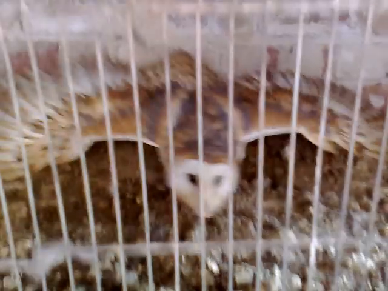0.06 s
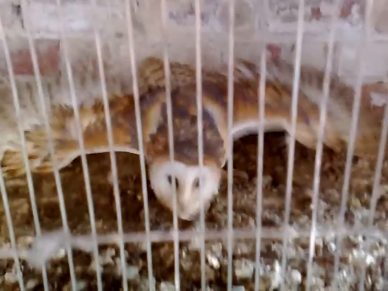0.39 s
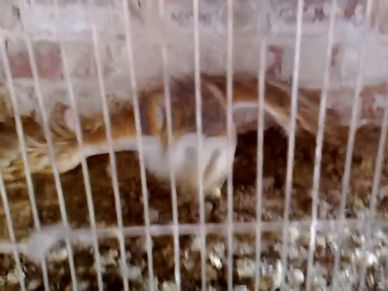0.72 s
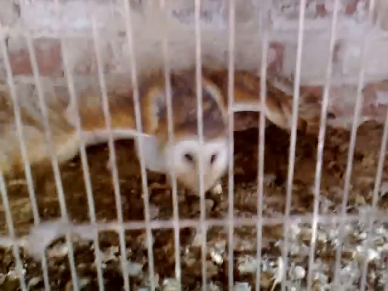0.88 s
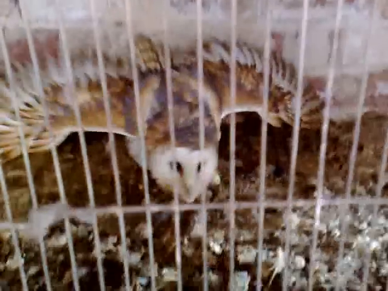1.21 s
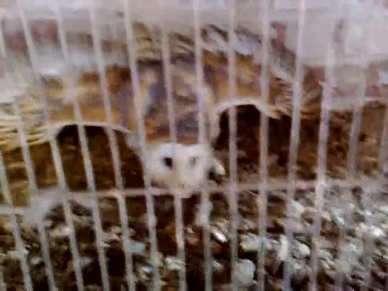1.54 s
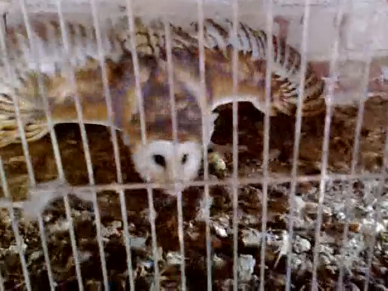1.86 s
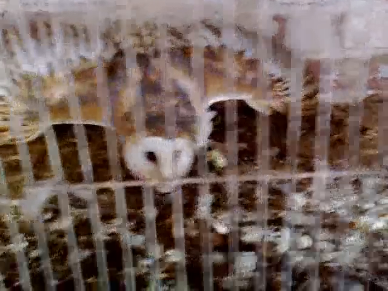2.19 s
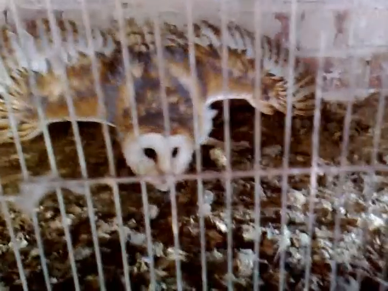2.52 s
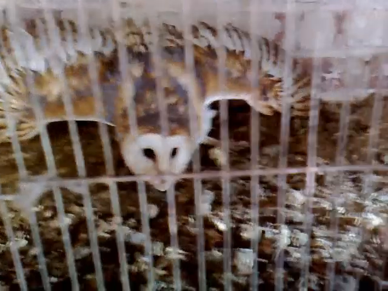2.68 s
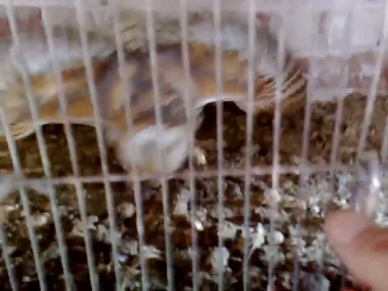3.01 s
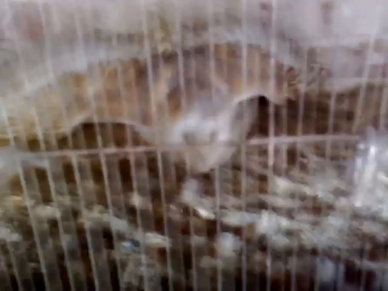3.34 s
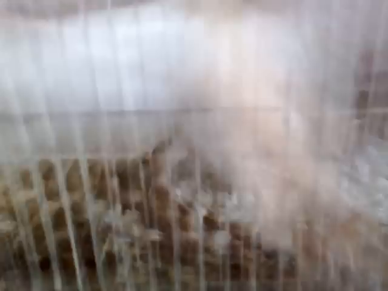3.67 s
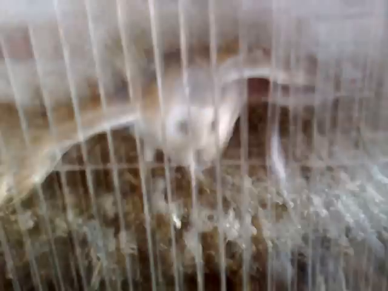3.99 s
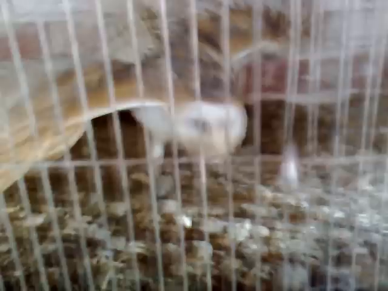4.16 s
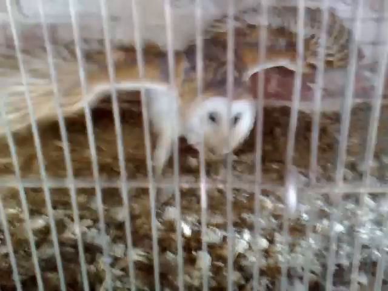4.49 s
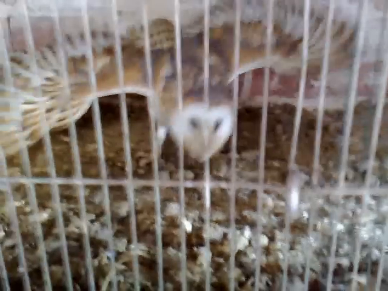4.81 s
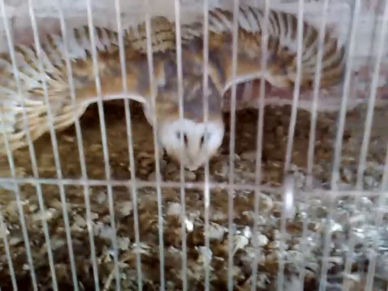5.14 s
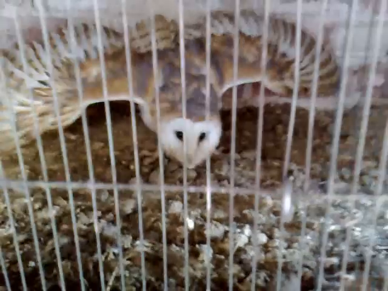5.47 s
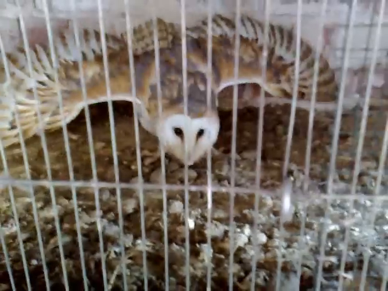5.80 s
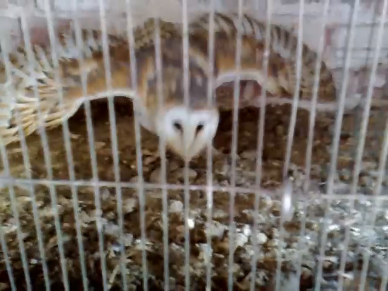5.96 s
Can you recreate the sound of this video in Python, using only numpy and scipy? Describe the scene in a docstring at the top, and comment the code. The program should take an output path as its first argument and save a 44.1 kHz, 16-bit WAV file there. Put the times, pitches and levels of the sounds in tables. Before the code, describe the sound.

Sharp bill clicks and breathy owl hisses, broken by a short, loud burst of knocking and rustling against cage bars.

```python
"""A barn owl hisses from a wire cage in a brick corner: air rushing through throat, mouth and bill.
Its bill snaps and clucks, its throat squeaks once, and faint puffs of breath fall between the snaps.
A hand sweeps at the bars close to the microphone and the owl lunges: a scuffle, with blows that
rattle the bars and make the cage floor boom. A second, longer and sharper hiss follows,
with thin whistles in it."""
import sys
import numpy as np
from scipy import signal
from scipy.fft import irfft, next_fast_len
from scipy.io import wavfile
from scipy.ndimage import uniform_filter1d

SR = 44100
rng = np.random.default_rng(int(sys.argv[2]) if len(sys.argv) > 2 else 0)


def generate_wav(sig):
    """Save sig (samples, or channels by samples) to the path in sys.argv[1] as 16-bit PCM at SR."""
    pcm = np.round(np.clip(np.atleast_2d(sig).T, -1, 1) * 32767).astype(np.int16)
    wavfile.write(sys.argv[1], SR, pcm)


N = 272538
TIME_S = np.arange(N) / SR


def gain_of(db):
    """Decibels to amplitude."""
    return 10 ** (np.asarray(db) / 20)


def unit_rms(x):
    """Scales to rms 1."""
    return x / np.sqrt(np.mean(x ** 2) + 1e-20)


def curve_at(points, hz):
    """Interpolates on a log-frequency axis."""
    knots_hz, values = np.transpose(points)
    return np.interp(np.log(hz + 1), np.log(knots_hz + 1), values)


def gate(start_s, end_s, rise_s, fall_s):
    """One from start to end, linear ramps outside."""
    return np.clip((TIME_S - start_s) / rise_s + 1, 0, 1) * np.clip((end_s - TIME_S) / fall_s + 1, 0, 1)


def add(mix, at_s, sound):
    """Mixes a sound in place."""
    part = mix[max(round(at_s * SR), 0):][:len(sound)]
    part += sound[:len(part)]


def noise(spectrum, size=N, top_hz=SR):
    """Coloured noise, rms 1, dulled above top_hz."""
    n = next_fast_len(size, True)
    hz = np.fft.rfftfreq(n, 1 / SR)
    colour = gain_of(curve_at(spectrum, hz)) / np.hypot(1, (hz / top_hz) ** 2)
    return unit_rms(irfft(colour * np.exp(2j * np.pi * rng.random(len(hz))), n)[:size])


def wander(knots_per_s):
    """Piecewise-linear random drift, rms 1."""
    knots = rng.standard_normal(4096)
    return unit_rms(np.interp(TIME_S * knots_per_s, np.arange(len(knots)), knots))


def resonance(hz, width_hz):
    """Turbulence in a steep resonance that follows hz, rms 1."""
    pole = np.exp(-np.pi * abs(width_hz) / SR)
    i, q = signal.lfilter([1], [1, -2 * pole, pole * pole], rng.standard_normal((2, N)))
    phase = 2 * np.pi * np.cumsum(hz * np.ones(N)) / SR
    return unit_rms(i * np.cos(phase) + q * np.sin(phase))


def bill_fizz(spectrum, flicker_db=2.5):
    """Air over the bill edges; its colour flickers in patches."""
    bins = signal.stft(noise(spectrum), SR, nperseg=512)[2]
    patches = uniform_filter1d(rng.standard_normal(bins.shape), size=7, axis=0)
    patches = unit_rms(uniform_filter1d(patches, size=9, axis=1))
    return unit_rms(signal.istft(bins * gain_of(flicker_db * patches), SR, nperseg=512)[1][:N])


# throat air (frequency [Hz], density [dB])
THROAT_SPECTRUM = [(200, -30), (400, -20.5), (780, -5), (980, -4.5), (1200, 1.5), (1620, -2), (1880, -5),
                   (2080, -8), (2450, -10), (3100, -19), (4500, -23.5), (16000, -56)]
# throat resonances (frequency [Hz], width [Hz], level [dB])
THROAT_FORMANTS = [(799, 105, -17.5), (1650, 130, -16.5), (1899, 95, -15.5), (2153, 160, -20.5),
                   (2484, 99, -19.5), (3137, 160, -27)]

def hiss(row, fizz_spectrum, throat_db, mouth_db, flutter_db, surge_db):
    """Air rushes through throat, mouth and bill; rising effort opens the mouth and lifts ring and fizz."""
    start_s, end_s, swell_s, effort_db, open_hz, width_hz, fizz_db = row
    slack_db = 5.5 * np.exp(-np.maximum(TIME_S - start_s, 0) / swell_s)  # below full effort
    mouth_hz = open_hz - 35 * slack_db + 28 * wander(25)
    mouth = gain_of(mouth_db - 0.7 * slack_db) * resonance(mouth_hz, width_hz)
    throat = gain_of(throat_db) * noise(THROAT_SPECTRUM)
    throat += sum(gain_of(db) * resonance(hz, band_hz) for hz, band_hz, db in THROAT_FORMANTS)
    air = (throat + mouth) * gain_of(flutter_db * wander(140))
    level = gain_of(effort_db - slack_db + surge_db * wander(15))
    fall_s, closing_s = 0.04, 0.18
    bill_open = np.clip((end_s + fall_s - TIME_S) / closing_s, 0, 1)
    fizz = bill_open * gain_of(fizz_db - slack_db) * bill_fizz(fizz_spectrum)
    return (air + fizz) * level * gate(start_s, end_s, 0.088, fall_s)


# hisses (start [s], end [s], swell [s], full effort [dB], mouth [Hz], width [Hz], relative fizz [dB])
HISSES = [(0.01, 0.593, 0.0199, -34, 1272, 65, -17.5), (4.28, 6.4, 0.55, -29.5, 1475, 179, -8.5)]
# air at the bill edges, per hiss (frequency [Hz], density [dB])
FIRST_FIZZ_SPECTRUM = [(3000, -29), (5000, -22), (6500, -4), (8700, 6), (11000, -7), (13300, 1.5),
                       (16000, -10)]
SECOND_FIZZ_SPECTRUM = [(3000, -18), (4500, -7), (5300, -9), (9400, -1.5), (10300, -3.5), (11300, -2),
                        (14200, 2.5), (15100, -11)]

def hisses():
    """Two threatening breaths, the second longer and sharper."""
    first = hiss(HISSES[0], FIRST_FIZZ_SPECTRUM, throat_db=-2.5, mouth_db=-4.5,
                 flutter_db=-1.0, surge_db=1.38)
    second = hiss(HISSES[1], SECOND_FIZZ_SPECTRUM, throat_db=-3.5, mouth_db=-2.3,
                  flutter_db=1.0, surge_db=0.4)
    return first + second


# whistles in the hisses (start [s], end [s], frequency [Hz], width [Hz], level [dB])
WHISTLES = [(0.0, 0.542, 2764, 130, -52.5), (4.53, 5.17, 6280, 243, -52.5), (4.5, 6.3, 9380, 463, -49.5),
            (4.62, 6.34, 11300, 278.6, -47), (4.98, 6.26, 7500, 240.7, -67), (5.5, 6.3, 4020, 110, -51.5)]

def whistles(flicker_db=2.0):
    """Thin, flickering air resonances: one in the first hiss, five in the second."""
    out = np.zeros(N)
    for start_s, end_s, hz, width_hz, db in WHISTLES:
        envelope = gate(start_s + 0.12, end_s - 0.1, 0.18, 0.11)
        out += gain_of(db + flicker_db * wander(18)) * resonance(hz, width_hz) * envelope
    return out


# ambient air, microphone hiss (frequency [Hz], density [dB])
AMBIENT_SPECTRUM = [(20, -2.5), (60, 0), (130, -9.5), (450, -10), (900, -14), (1250, -12.5), (1600, -20),
                    (2500, -19), (3200, -26.5), (16000, -60)]
MIC_SPECTRUM = [(1000, 2.5), (16000, -1)]
# ambient air trim (time [s], level [dB])
AMBIENT_TRIM = [(1.3, 3), (2.5, -2)]

def background(air_db=-59, mic_db=-69.5):
    """Quiet low air, a little louder at first, and steady microphone hiss."""
    trim_db = np.interp(TIME_S, *np.transpose(AMBIENT_TRIM))
    return gain_of(air_db + trim_db) * noise(AMBIENT_SPECTRUM) + gain_of(mic_db) * noise(MIC_SPECTRUM)


# bill impact (frequency [Hz], density [dB])
CRACK_SPECTRUM = [(150, -32.5), (450, -21.5), (900, -0.5), (1600, -0.5), (2400, -7), (2900, -9.5),
                  (3500, -12.5), (5300, -17), (7500, -24.5), (16000, -26.5)]

def snap(ring_db, mouth_hz, crack_db, crack_peak_s, ring_peak_s=0.0023, overtone_db=-22):
    """The bill cracks shut, brighter the harder; the closing mouth rings for a few falling cycles."""
    t = np.arange(2048) / SR
    ring_age, crack_age = t / ring_peak_s, t / crack_peak_s
    falling_hz = mouth_hz * (1 + 0.056 * np.tanh(1 - ring_age))
    phase = 2 * np.pi * np.cumsum(falling_hz) / SR
    mouth = np.sin(phase) + gain_of(overtone_db) * np.sin(2 * phase)
    mouth *= (ring_age * np.exp(1 - ring_age)) ** 2.45
    crack = noise(CRACK_SPECTRUM, size=len(t), top_hz=36000 * gain_of(crack_db / 2))
    crack *= (crack_age * np.exp(1 - crack_age)) ** 2
    return gain_of(ring_db) * mouth + gain_of(crack_db) * crack


# bill snaps (time [s], ring [dB], mouth [Hz], crack [dB])
SNAPS = [(0.0173, -20, 1390, -13), (0.7005, -17, 1190, -12.5), (0.92, -16, 773, -18),
         (1.5534, -9.5, 1334, -13.5), (2.4302, -9, 1367, -14), (3.3668, -15.5, 1301, -15),
         (5.447, -22, 1136, -15)]
# clucks leading up to snaps (time [s], ring [dB])
CLUCKS = [(0.6395, -19.5), (0.857, -30.5), (1.424, -44), (1.4885, -16.5), (2.286, -41.5), (2.37, -17.5),
          (3.227, -44), (3.3137, -26)]

def snaps_and_clucks():
    """Hard snaps, and clucks: the same motion made gently."""
    out = np.zeros(N)
    for at_s, ring_db, mouth_hz, crack_db in SNAPS:
        add(out, at_s, snap(ring_db, mouth_hz, crack_db, crack_peak_s=0.003))
    for at_s, ring_db in CLUCKS:
        add(out, at_s, snap(ring_db, mouth_hz=1323, crack_db=-25 + 0.57 * ring_db, crack_peak_s=0.0031))
    return out


# squeak partials (harmonic [number], level [dB])
SQUEAK_HARMONICS = [(1, -2), (2, 9.5), (3, -19), (4, -15), (6, -20)]

def squeak(start_s=0.605, end_s=0.638, level_db=-34, start_hz=825, sag_hz_per_s=1500, jitter=0.0074):
    """The narrowing throat ends the first hiss on a brief falling note."""
    hz = start_hz - sag_hz_per_s * (TIME_S - start_s)
    phase = 2 * np.pi * np.cumsum(hz * (1 + jitter * wander(300))) / SR
    tone = sum(gain_of(db) * np.cos(k * phase) for k, db in SQUEAK_HARMONICS)
    return gain_of(level_db) * unit_rms(tone) * gate(start_s, end_s, 0.007, 0.0064)


def ring(modes, t):
    """Struck modes decaying from random phases."""
    return sum(gain_of(db - 60 * t / t60_s) * np.sin(2 * np.pi * (hz * t + rng.random()))
               for hz, db, t60_s in modes)


# blows on the cage (time [s], thud [dB], bar clatter [dB], floor drumming [dB], floor sway [dB])
KNOCKS = [(1.051, -31, -40, -35, -50.5), (1.158, -45, -38.5, -57, -70), (3.648, -31.5, -35.5, -43, -48),
          (3.705, -37, -38.5, -39.5, -45), (3.737, -34.5, -37.5, -46, -37.5), (3.836, -34, -5.5, -43, -44),
          (3.915, -34, -20, -32, -40), (3.868, -21.5, -17.5, -33, -40), (3.902, -27, -25, -14.5, -24),
          (3.952, -25, -27, -20.5, -26), (4.076, -21, -24.5, -30, -25), (4.129, -12.5, -29, -32, -29),
          (4.168, -39, -13, -28, -40), (4.229, -21, -27.5, -30, -26.5), (4.381, -32, -34.5, -38, -30),
          (4.859, -17.5, -36, -43, -42.5), (4.949, -30.5, -39, -42, -43)]
# impact noise (frequency [Hz], density [dB])
THUD_SPECTRUM = [(80, -9), (200, -11.5), (350, 0.5), (550, 2.5), (780, 2), (1100, -16.5), (8000, -55)]
CLATTER_SPECTRUM = [(200, -30), (1300, 2), (2900, 0.5), (3700, -5), (5800, -6), (8500, -9.5), (16000, -5.5)]
# modes of bars and cage floor (frequency [Hz], level [dB], t60 [s])
BAR_MODES = [(1158, -9, 0.53), (1770, -5.5, 0.088), (2110, -8, 0.11), (2340, -5, 0.32), (2900, -22.5, 0.38),
             (2850, -11, 0.5)]
CAGE_FLOOR_MODES = [(62, -1, 0.99), (204, 0.5, 0.22), (289, -12.5, 0.093)]

def cage_knocks(thud_t60_s=0.075, clatter_t60_s=0.069, bars_db=-14):
    """Blows thud, rattle the bars and ring the floor's upper modes; harder is quicker and brighter."""
    t, out = np.arange(SR // 2) / SR, np.zeros(N)
    for at_s, thud_db, clatter_db, drum_db, _ in KNOCKS:
        hardness = gain_of(clatter_db / 2)
        contact_s = 0.00027 / hardness
        thud = noise(THUD_SPECTRUM, size=len(t)) * gain_of(thud_db - 60 * t / thud_t60_s)
        clatter = noise(CLATTER_SPECTRUM, size=len(t), top_hz=30000 * hardness)
        clatter *= gain_of(-60 * t / clatter_t60_s)
        clatter += gain_of(bars_db) * ring(BAR_MODES, t)
        blow = thud + gain_of(clatter_db) * clatter + gain_of(drum_db) * ring(CAGE_FLOOR_MODES[1:], t)
        add(out, at_s, blow * (1 - np.exp(-t / contact_s)))
    return out


# cage shaking (frequency [Hz], density [dB])
SHAKE_SPECTRUM = [(15, -13.5), (32, -12.5), (60, 4.5), (90, -9), (150, -14), (205, -6), (270, -14),
                  (3000, -46), (16000, -75)]

def cage_boom(shake_db=-3, pitch_drift=0.067, build_s=0.004):
    """Each blow sets the cage floor swaying unevenly at its lowest mode, over broad shaking noise."""
    hz, mode_db, t60_s = CAGE_FLOOR_MODES[0]
    power = np.zeros(N)
    for at_s, *_, sway_db in KNOCKS:
        age_s = np.maximum(TIME_S - at_s, 0)
        power += (gain_of(sway_db - 60 * age_s / t60_s) * (1 - np.exp(-age_s / build_s))) ** 2
    phase = 2 * np.pi * np.cumsum(hz * (1 + pitch_drift * wander(8.8))) / SR
    sway = unit_rms(np.sin(phase) * gain_of(2 * wander(7.2)))
    return np.sqrt(power) * (gain_of(mode_db) * sway + gain_of(shake_db) * noise(SHAKE_SPECTRUM))


# breaths (start [s], rise [s], hold [s], level [dB], fade [dB/s])
PUFFS = [(1.116, 0.036, 0.074, -48, 80), (1.44, 0.048, 0.073, -56.5, 28.5), (1.973, 0.02, 0.092, -51, 159),
         (2.709, 0.21, 0.11, -53, 160.5)]
# breath air (frequency [Hz], density [dB])
PUFF_SPECTRUM = [(400, -22.5), (1400, 5), (2100, -4.5), (2600, -3), (6000, -15), (16000, -20.5)]

def puffs(air_db=-3.5, mouth_db=-8.0):
    """The owl draws air through its open bill: each puff rises, holds and fades."""
    level = np.zeros(N)
    for start_s, rise_s, hold_s, db, fade_db_per_s in PUFFS:
        age_s = TIME_S - start_s
        fade_db = fade_db_per_s * np.maximum(age_s - rise_s - hold_s, 0)
        level += np.clip(age_s / rise_s, 0, 1) * gain_of(db - fade_db)
    air = gain_of(air_db) * noise(PUFF_SPECTRUM)
    mouth = gain_of(mouth_db) * resonance(hz=1390, width_hz=190)
    return level * (air + mouth)


# rubbing and swishing of hand, bars and feathers (frequency [Hz], density [dB])
RUB_SPECTRUM = [(100, -6.5), (220, 0), (450, -7.5), (800, -1), (1000, -3.5), (1750, 0.5), (2900, -6.5),
                (3500, -12.5), (6000, -10.5), (9000, -14.5), (14000, -12), (16000, -16.5)]
SWISH_SPECTRUM = [(2000, -6), (7000, -9.5), (11300, -1.5), (16000, -11)]
# bright swishes (time [s], Gaussian sigma [s], level [dB])
SWISHES = [(3.888, 0.0081, -17), (4.02, 0.023, -26.5), (4.102, 0.0098, -21), (4.424, 0.011, -43)]

def scuffle(start_s=3.829, end_s=4.19, rub_db=-27, grain_db=2.36):
    """The hand sweeps past and the wings beat: a burst that settles to grainy rubbing."""
    burst_db = 8.5 * np.exp(-abs(TIME_S - 3.865) / 0.11)
    rub = gain_of(rub_db + burst_db) * noise(RUB_SPECTRUM) * gate(start_s, end_s, 0.004, 0.089)
    swish_level = sum(gain_of(db) * np.exp(-0.5 * ((TIME_S - at_s) / sigma_s) ** 2)
                      for at_s, sigma_s, db in SWISHES)
    return (rub + swish_level * noise(SWISH_SPECTRUM)) * unit_rms(gain_of(grain_db * wander(420)))


# floor and wall reflections (delay [s], gain [linear])
ECHOES = [(.0034, 0.1), (.0062, -0.095), (.0088, -0.025)]
# reverberation (frequency [Hz], t60 [s])
CORNER_DECAY = [(200, 0.24), (1200, 0.098), (5000, 0.069), (16000, 0.07)]

def brick_corner(sound, tail_db=-9, predelay_s=0.0018):
    """Adds close reflections and a short tail that loses its treble first."""
    hz, t, bins = signal.stft(rng.standard_normal(SR // 3), SR, nperseg=256)
    decay = gain_of(-60 * t / curve_at(CORNER_DECAY, hz)[:, None])
    tail = signal.istft(bins * decay, SR, nperseg=256)[1]
    tail *= np.clip(np.arange(len(tail)) / SR / predelay_s - 1, 0, 1)
    response = gain_of(tail_db) * tail / np.linalg.norm(tail)
    for delay_s, gain in ECHOES:
        add(response, delay_s, np.array([gain]))
    return sound + signal.fftconvolve(sound, response)[:N]


def scene():
    """Owl and cage in their corner over quiet air, mono."""
    owl = hisses() + whistles() + puffs() + squeak() + snaps_and_clucks()
    return (brick_corner(owl + scuffle() + cage_knocks()) + cage_boom() + background())[None]


def record(dry, ceiling=0.84, cutoff_hz=15850):
    """The microphone rounds off the loudest peaks; a low-pass limits the band."""
    rounded = ceiling * np.tanh(dry / ceiling)
    lowpass = signal.firwin(511, cutoff_hz, window=("kaiser", 9), fs=SR)
    return signal.oaconvolve(rounded, lowpass[None], "same")


dry = scene()
out = record(dry)
generate_wav(out)
```